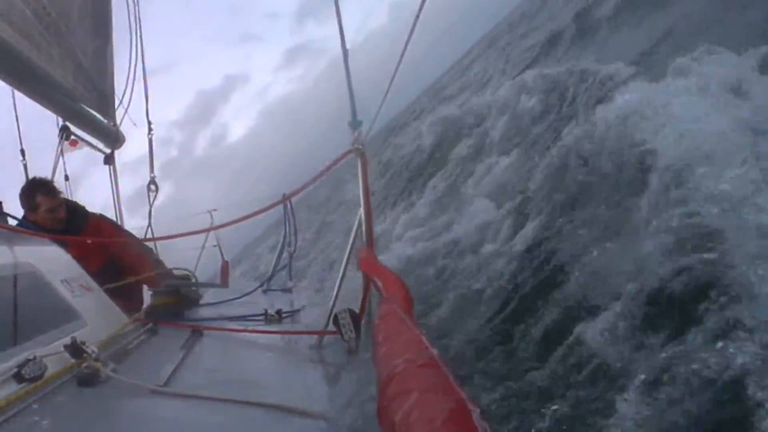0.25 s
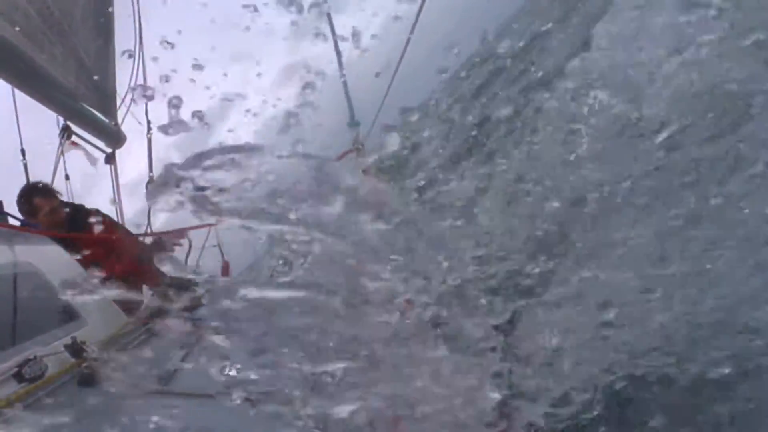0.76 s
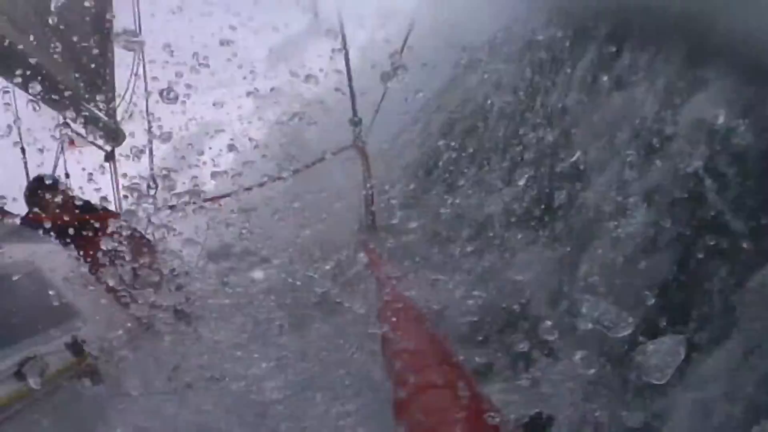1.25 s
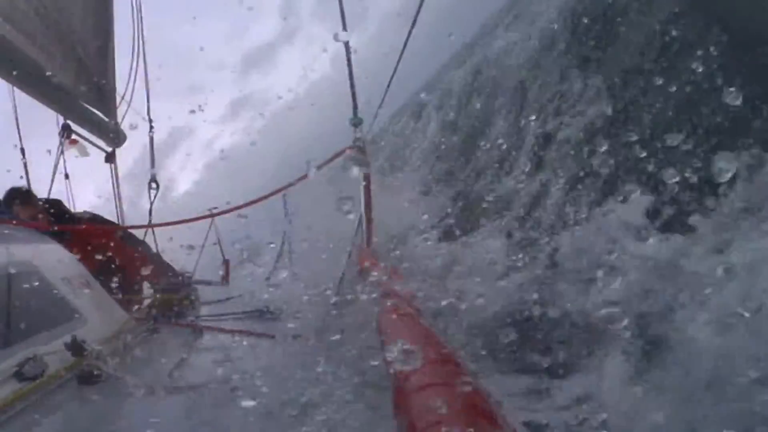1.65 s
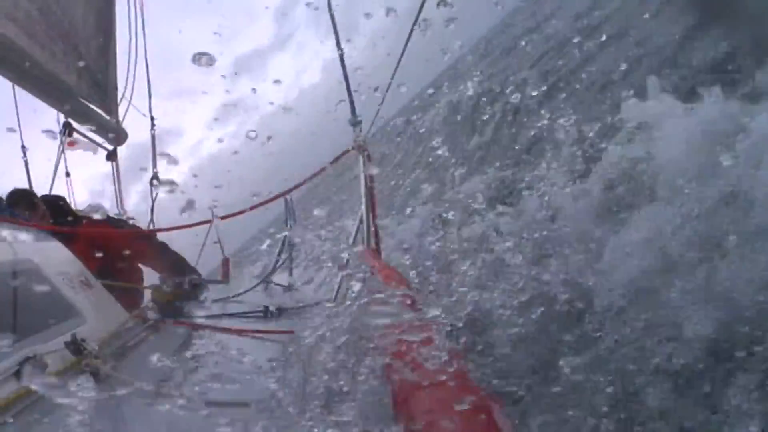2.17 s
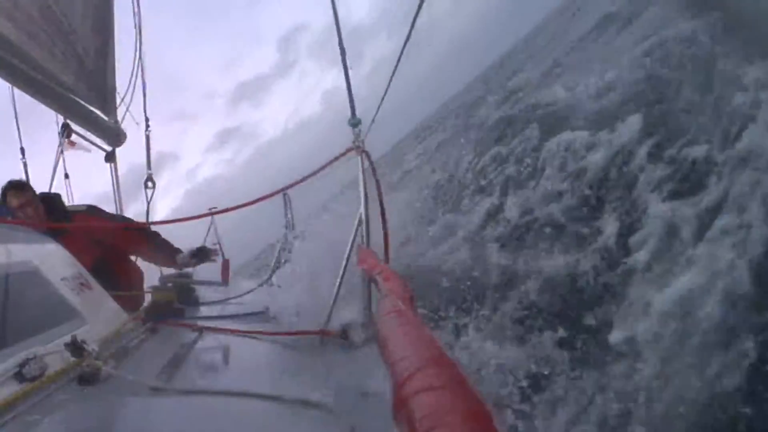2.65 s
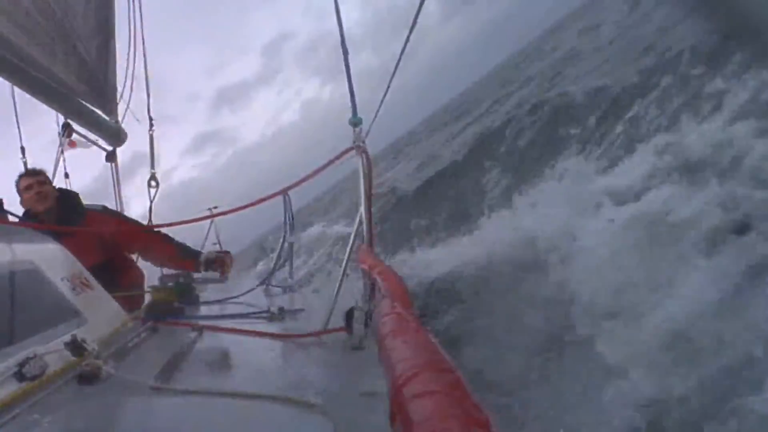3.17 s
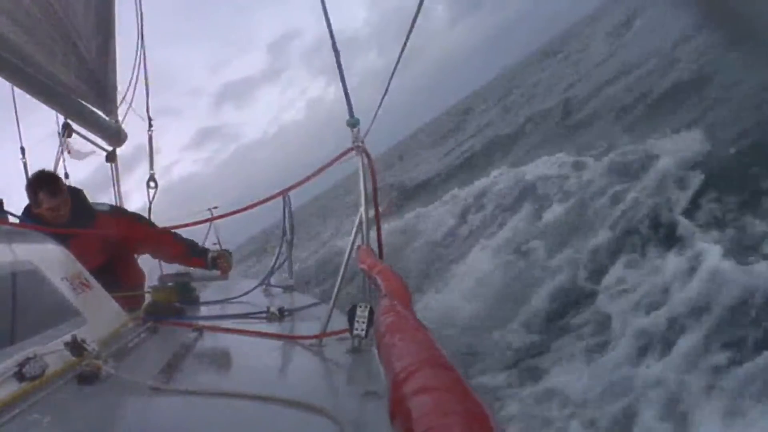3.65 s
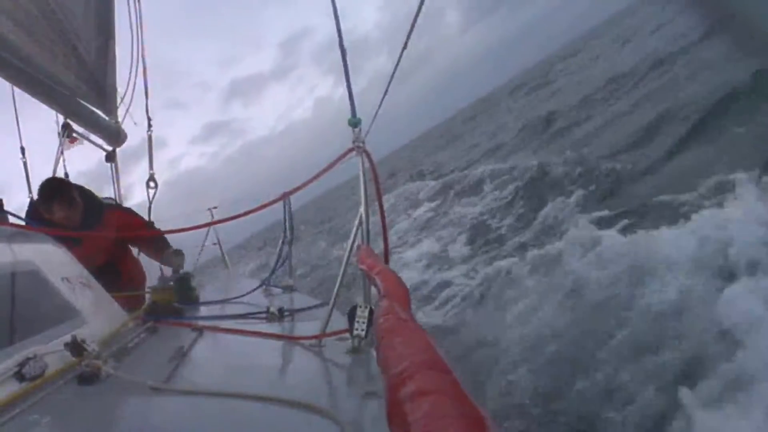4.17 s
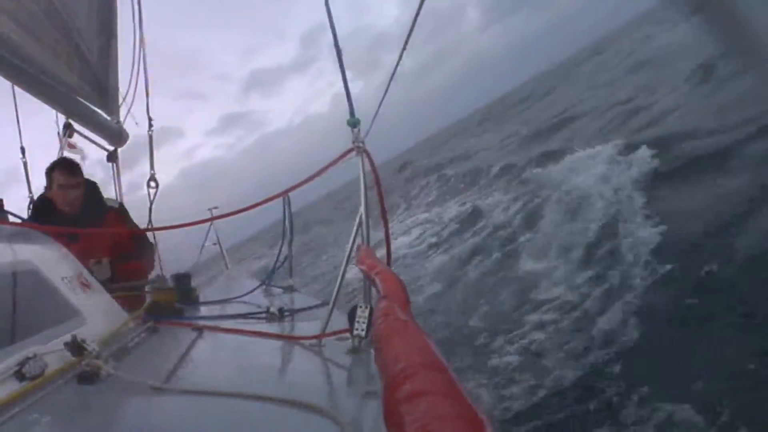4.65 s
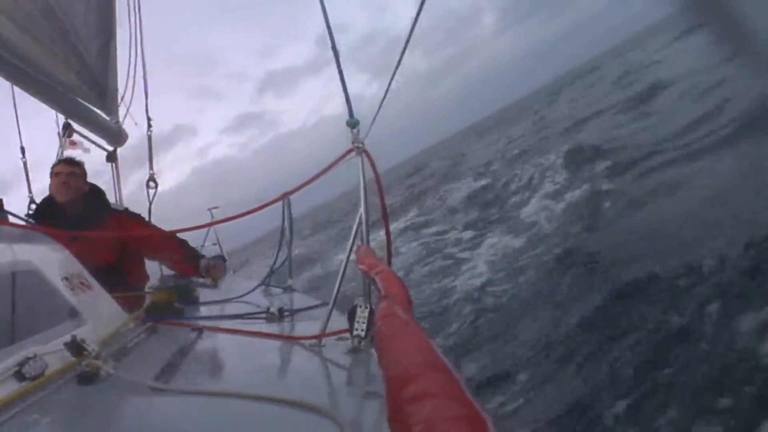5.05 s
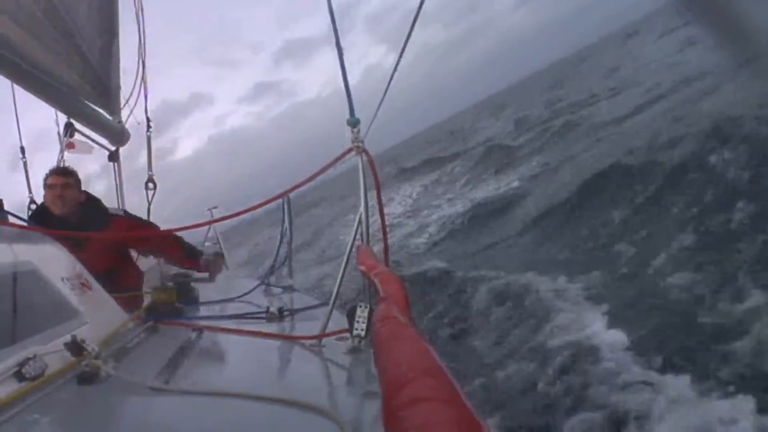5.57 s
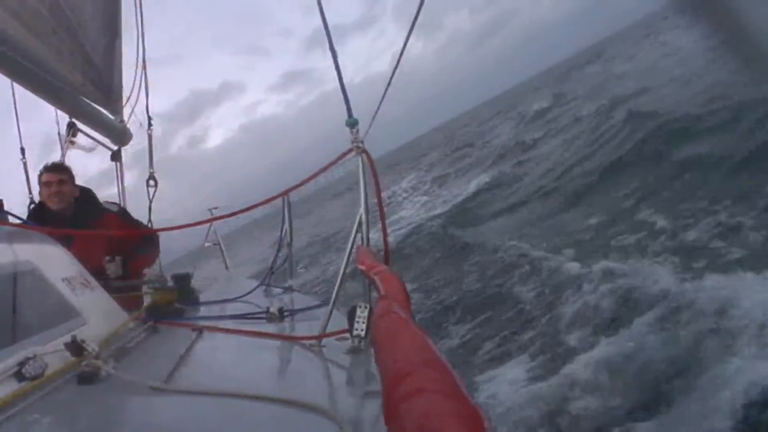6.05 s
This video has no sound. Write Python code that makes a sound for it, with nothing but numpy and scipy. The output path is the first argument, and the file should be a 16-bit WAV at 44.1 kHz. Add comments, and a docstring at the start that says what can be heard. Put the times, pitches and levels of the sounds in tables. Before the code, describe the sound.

A microphone shut in a waterproof housing on a sailing yacht hears everything dull and boxy. Rapid wet slaps and a creaking line come first, then dense spray surges over the case in waves, with gulps and gurgles. Around three seconds water drains away and drops patter; a loose fitting knocks repeatedly. The sea drops to a faint distant wash with soft hull bumps, until two hard slams thud and distort.

```python
"""A sealed camera housing rides the rail of a sailing yacht in breaking seas; all is heard inside the shut case.
From the start wind and swell rock the microphone below hearing, the far sea is a noise floor, spray washes the
housing as noise through its resonances, a line creaks by stick and slip, and water gulps and slaps the lid.
Then trapped air gurgles, drops tick, foam fizzes, a loose fitting knocks, water drains, wet rubber squeaks and
small seas bump the hull. Near the end two heavy slams ring a hull panel and overload the recorder."""
import sys
import numpy as np
from scipy import signal
from scipy.fft import rfft, irfft, next_fast_len
from scipy.io import wavfile
from scipy.ndimage import uniform_filter1d, map_coordinates

SR = 44100
rng = np.random.default_rng(int(sys.argv[2]) if len(sys.argv) > 2 else 0)


def digitize_waveform(pressure):
    """Quantize a signal to 16-bit integers and store it at the path in sys.argv[1].

    Rows of a 2-D input are taken as channels; values are limited to [-1, 1].
    """
    field = np.atleast_2d(pressure).T
    bounded = np.clip(field, -1, 1)
    quanta = np.round(bounded * 32767).astype(np.int16)
    wavfile.write(sys.argv[1], SR, quanta)


def nominal_scale(level):
    """Amplitude ratio for a level in decibels (scalar or array-like)."""
    x = np.asarray(level, float) / 20
    return 10 ** x


N = 278271


def unit(x):
    """Scaled to rms 1."""
    return x / np.sqrt(np.mean(x ** 2, -1, keepdims=True) + 1e-20)


def column(values):
    """One row per part of the housing."""
    return np.array(values)[:, None]


def curves(rows):
    """One value per sample for each column after the time."""
    knots_s, *columns = np.transpose(rows)
    return np.array([np.interp(np.arange(N) / SR, knots_s, c) for c in columns])


def wobble(rate):
    """A smooth random curve, rate knots a second."""
    knots = rng.standard_normal(int(N * rate / SR) + 4)
    return map_coordinates(knots, [np.arange(N) * rate / SR])


def coloured(spectrum):
    """Noise of rms 1 shaped by rows of Hz and relative dB per Hz."""
    size = next_fast_len(N)
    f, db = np.transpose(spectrum)
    hz = np.fft.rfftfreq(size, 1 / SR)
    gain = nominal_scale(np.interp(np.log(hz + 1), np.log(f + 1), db))
    return unit(irfft(rfft(rng.standard_normal(size)) * gain, size)[:N])


# Housing and mount resonances. Each row: centre in Hz, width parameter in Hz, relative level in dB.
RESONANCES = [(92.5, 93, -19), (129.7, 21.6, 2), (184.6, 18, -5), (246.5, 75, -7.5), (309.6, 40.7, -6),
              (431.7, 92, -14.5), (549.6, 81, -9.5), (621.4, 49, -3), (691, 29, -4), (756.4, 107, -6.5),
              (953, 130, -7), (1126, 100, -18.5), (1397, 59, 2.5), (1469, 72, 6.5), (1544, 123, 4),
              (1640, 99, -6.5), (1836, 230, -3.5), (2026, 110, -10), (2320, 1300, -24.5), (2990, 320, -30),
              (3173, 210, -23.5), (3464, 170, -27.5), (3936, 217, -22.5), (4300, 440, -34.5),
              (5330, 4500, -54)]
# Edges in Hz of the parts, heavy to light: rail, mount, body, lid, lid corner, lens port.
# Every per-part table below keeps this order.
PART_EDGES_HZ = [60, 155, 470, 1270, 1740, 2180, 6200]


def rings(extra_db=0):
    """Causal impulse response of each part of the housing, peak 1, from its share of the resonances."""
    size = 2 ** 14
    hz = np.fft.rfftfreq(size, 1 / SR) + 0.00086
    modes = np.add(RESONANCES, np.outer(extra_db, [0, 0, 1]))
    power = sum(nominal_scale(2 * db) / (1 + (2 * (hz - c) / w) ** 2) ** 2.27 for c, w, db in modes)
    low_hz, high_hz = column(PART_EDGES_HZ[:-1]), column(PART_EDGES_HZ[1:])
    steep = np.clip(high_hz / 60, 3, 9)  # the low parts overlap more
    share = 1 / (1 + (low_hz / hz) ** (2 * steep)) / (1 + (hz / high_hz) ** (2 * steep))
    cepstrum = irfft(np.log(power * share + 1e-13) / 2)
    cepstrum[:, 1:size // 2] *= 2  # folding the cepstrum makes the ring follow its blow
    cepstrum[:, size // 2 + 1:] = 0
    ring = irfft(np.exp(rfft(cepstrum)))[:, :size // 2]
    return ring / np.abs(ring).max(1, keepdims=True)


def through(force, ring):
    """Forces on the parts, heard through their rings."""
    return signal.fftconvolve(force, ring, axes=1)[:, :N]


# Wind and swell. Each row: time in seconds, level in dB.
ROCKING_DB = [(0.0, -49), (1.18, -46), (1.32, -30), (1.72, -44.5), (2.16, -31), (2.34, -53), (2.39, -36),
              (2.53, -43.5), (3.62, -45.5), (3.69, -53), (5.36, -48.5), (5.43, -37), (5.59, -47),
              (6.31, -57)]
# Each row: frequency in Hz, relative dB per Hz.
ROCKING_SPECTRUM = [(4.7, -35.5), (8.0, -6.5), (16, 1.5), (34, 1.5), (64, -19), (90, -25.5), (120, -60.5),
                    (200, -120)]


def rocking():
    """Wind and swell make slow pressure lumps, mostly below hearing."""
    return nominal_scale(curves(ROCKING_DB)[0]) * coloured(ROCKING_SPECTRUM)


# Each row: time in seconds, level in dB.
FAR_SEA_DB = [(0, -50), (3.5, -52), (4.3, -46.5), (4.7, -50), (5.2, -53), (5.6, -51.5), (5.85, -51),
              (6.31, -50)]
# Sea through the shut case. Each row: frequency in Hz, relative dB per Hz.
FAR_SEA_SPECTRUM = [(35, -27), (60, -1.5), (81, -1), (123, -4.5), (226, -1), (364, -17), (630, -25),
                    (733, -20.5), (1070, -19.5), (1400, -9.5), (1900, -21), (2260, -18.5), (2520, -28.5),
                    (2900, -19.5), (3300, -34), (3890, -19.5), (4150, -25.5), (4450, -27.5), (4950, -36),
                    (5400, -36), (5750, -39), (6200, -79.5), (12300, -120)]


def far_sea():
    """The distant sea is a smooth noise floor that wavers slightly."""
    return nominal_scale(curves(FAR_SEA_DB)[0] + 1.5 * wobble(7.9)) * coloured(FAR_SEA_SPECTRUM)


# Spray and solid water on the lid, then thin drizzle.
# Each row: time in seconds, strength in dB, spread (extra off the lid) in dB.
SPRAY_STRENGTH = [(0.0, -18, 0.5), (0.06, -18.5, -0.5), (0.25, -20.5, 2), (0.41, -22.5, 9.5),
                  (0.46, -36, -3.5), (0.55, -52, 2), (0.66, -33, -1), (0.81, -26, 5.5), (0.89, -15.5, 12),
                  (0.92, -22.5, 4.5), (0.98, -13.5, 10), (1.01, -20, 5), (1.08, -18.5, 7.5),
                  (1.14, -33, -6), (1.2, -25, 1), (1.26, -40.5, -16), (1.3, -25, -3), (1.42, -19.5, -3.5),
                  (1.5, -19, -7), (1.6, -19, -7.5), (1.82, -38, -3), (2.0, -27.5, -6.5), (2.1, -28, -0.5),
                  (2.21, -20.5, 0), (2.3, -19.5, -2), (2.42, -20, 5.5), (2.47, -30.5, 0.5),
                  (2.61, -30.5, -3), (2.67, -39, -4), (2.7, -43, 15.5), (2.89, -24.5, 9.5),
                  (2.92, -39.5, 0), (3.01, -20, 8.5), (3.04, -31, 6), (3.25, -34, -13), (3.4, -43.5, 4),
                  (3.45, -40.5, -9), (3.55, -39.5, -29), (3.8, -64.5, 7), (4.0, -53, -1.5), (4.2, -51.5, 4),
                  (4.67, -85, 20), (4.94, -67.5, 1.5), (5.56, -58, -0.5), (6.31, -69, 3)]
# Per part: share of a full wash in dB.
SPRAY_SHARE_DB = [-41.5, -15.5, -9.5, -2, -24.5, -19]
# Per part: growth in dB per dB of spray.
SPRAY_GROWTH = [1.2, 0.46, 0.68, 1.24, 0.37, 0.88]
# Per part: fraction of the spread taken.
SPRAY_SPREAD = [.1, 0.093, 0.65, 0.029, 0.43, 1]
# Per part: seconds over which the spray is evened out.
SPRAY_LINGER_S = [.15, 0.041, 0.088, .005, 0.044, 0.26]
# A film dulls or livens the port. Each row: time in seconds, extra level in dB.
PORT_FILM_DB = [(0, 4.5), (0.5, -6.5), (0.8, -5), (0.93, -6), (1.08, -4), (1.3, 0), (1.6, 4.5), (2.2, -4),
                (2.5, 1), (2.8, 0), (3.2, -11.5), (4, 4.5), (5.4, 8), (5.7, 0), (6.31, 6)]


def spray_gain():
    """Spray drives each part over its own smoothing time and growth law."""
    full_db = -20  # strength of a full wash
    strength_db, spread_db = curves(SPRAY_STRENGTH)
    evened_db = np.array([uniform_filter1d(strength_db, int(s * SR) + 1) for s in SPRAY_LINGER_S])
    grown_db = column(SPRAY_GROWTH) * (evened_db - full_db)
    gain = nominal_scale(full_db + column(SPRAY_SHARE_DB) + grown_db + column(SPRAY_SPREAD) * spread_db)
    gain[-1] *= nominal_scale(curves(PORT_FILM_DB)[0])
    return gain


# Each row: time in seconds, strength in dB.
HULL_STRENGTH = [(0.0, -60.5), (0.98, -40.5), (1.47, -46.5), (1.7, -40.5), (2.67, -48.5), (2.8, -54),
                 (2.99, -28.5), (3.29, -42), (3.58, -44.5), (3.76, -43.5), (3.97, -34.5), (4.55, -53),
                 (4.67, -45), (4.92, -59), (5.43, -46), (5.59, -38.5), (5.71, -44), (5.96, -55),
                 (6.31, -50)]
# Per part: level in dB relative to that strength.
HULL_SHARE_DB = [-1.5, -8, -28.5, -40, -36.5, -48.5]


def hull_gain():
    """The hull drums through the rail, mostly into the heavy parts."""
    return nominal_scale(curves(HULL_STRENGTH) + column(HULL_SHARE_DB))


def water(ring):
    """Dense uneven drops over smooth flow ring the parts; surges are partly shared, the flows add in power."""
    drop_size = nominal_scale(np.minimum(3 * rng.exponential(size=N), 11))
    drops = (rng.random(N) < 1000 / SR) * drop_size * rng.standard_normal((6, N))  # 1000 per s
    force = 0.71 * rng.standard_normal((6, N)) + 0.55 * unit(drops)
    shared_db = 1.1 * wobble(25.07) + 0.91 * wobble(70)
    own_db = column([2.5, 1.2, 1.4, 1.7, 1.5, 1.5]) * np.array([wobble(20) for _ in ring])
    heard = unit(through(nominal_scale(shared_db + own_db) * force, ring))
    gain = np.sqrt(spray_gain() ** 2 + runoff_gain() ** 2 + hull_gain() ** 2)
    wash = (gain * heard).sum(0)
    z = signal.stft(wash, nperseg=1024)[2]
    # the wet surface shifts, so patches of pitch swell and fade
    field = uniform_filter1d(rng.standard_normal(z.shape), 5, axis=0)
    field = uniform_filter1d(field, 9, axis=1)
    return signal.istft(z * nominal_scale(1.4 * field / field.std()), nperseg=1024)[1][:N]


# One list per creak. Each row: time in seconds, slips per second, relative level in dB.
LINE_CREAKS = [
    [(0.0, 270, -20.5), (0.11, 283, -46), (0.156, 264, -34), (0.232, 226, -32.5), (0.26, 195, -29),
     (0.335, 185, -25), (0.36, 188, -38.5), (0.42, 176, -33), (0.47, 190, -29.5)],
    [(1.4, 120, -29.5), (1.436, 207, -32), (1.5, 226, -39), (1.6, 167, -29.5), (1.65, 200, -33.5)],
]


def creak(ring):
    """A loaded line sticks and slips: uneven tugs ring mount and body round a tone at the slip rate."""
    out, t = np.zeros(N), np.arange(N) / SR
    for rows in LINE_CREAKS:
        rate_hz, db = curves(rows)
        slip_count = np.floor(np.cumsum(rate_hz * (1 + 0.071 * wobble(60))) / SR)
        tugs = np.diff(slip_count, prepend=0) * nominal_scale(0.93 * wobble(200))
        mount, body = unit(through(tugs[None], ring[1:3]))
        tone = np.sin(2 * np.pi * np.cumsum(rate_hz) / SR) * np.sqrt(2)
        on = np.clip(np.minimum(t - rows[0][0] + 0.0061, rows[-1][0] - t) / 0.01, 0, 1)
        out += on * nominal_scale(db) * (0.97 * tone + 0.063 * mount + 0.59 * body)
    return out


# Each row: peak time in seconds, length in seconds, pitch in Hz, relative level in dB.
WATER_GULPS = [(0.072, 0.14, 772, -17.5), (0.201, 0.13, 740, -19.5), (0.35, 0.22, 769, -34),
               (0.877, 0.43, 747, -29), (1.085, 0.36, 711, -26), (2.14, 0.34, 730, -29.5),
               (2.52, 0.074, 962, -24.5), (2.643, 0.069, 943, -20), (2.785, 0.056, 740, -14.5),
               (2.881, 0.068, 744, -16), (2.998, 0.16, 723, -23), (3.09, 0.16, 735, -26),
               (4.354, 0.036, 730, -32), (5.138, 0.044, 740, -36), (0.844, 0.11, 176.4, -19.5),
               (1.088, 0.089, 175, -24), (2.376, 0.073, 186, -23)]


def gulps():
    """Water over body and mount gulps: a narrow fluttering noise band swells and fades on a hollow note."""
    out, t = np.zeros(N), np.arange(N) / SR
    for s, length_s, hz, db in WATER_GULPS:
        swell = np.cos(np.pi * np.clip((t - s) / length_s, -.5, .5)) ** 2
        turn = 2 * np.pi * hz * t
        band = wobble(60) * np.cos(turn) + wobble(60) * np.sin(turn)
        out += swell * nominal_scale(db - 5.5) * band
    return out


# Blows wake the resonances unevenly. Per resonance, in table order: extra level in dB.
STRUCK_EXTRA_DB = [0, 3, 2.3, 3, 3.5, -0.5, -4, -5.5, 4, 4, -0.5, -8, -1.5, -4.5, -5.5, 2.5, -3.5, -6, 0,
                   3.5, -9, 1.5, 4, 10.5, 3.5]
# Per part: t60 in seconds of the damping added by contact.
CONTACT_DAMPING_T60_S = [0.4, 0.19, 0.45, 0.063, 0.077, 0.041]


def struck_rings():
    """A blow lands at one spot, and its contact soaks up part of each part's ring."""
    ring = rings(STRUCK_EXTRA_DB)
    t = np.arange(ring.shape[1]) / SR
    return ring * nominal_scale(-60 * t / column(CONTACT_DAMPING_T60_S))


# Per part: fraction of the heft taken.
HEFT_SHARE = np.array([0.8, 0.38, 0, 0.0076, 0.19, 0.47])
# Per part: fraction of the edge taken.
EDGE_SHARE = np.array([0.26, 0.039, 0.065, 0.57, 0.91, 0.96])


def blows(rows, kind_db, struck):
    """Each blow is a first contact and a short uneven chatter; soft blows are mostly chatter."""
    force, t = np.zeros((6, N + SR)), np.arange(SR // 10) / SR
    light = column([.2, .35, .45, .9, 1, 1])  # chatter hardly moves the heavy parts
    for s, db, heft_db, edge_db, softness in rows:
        soft = np.clip(softness, 0, 1)
        rise = 1 - np.exp(-t / (0.0061 * soft ** 2 + 1e-4))
        decay = nominal_scale(-60 * t / (0.0079 + 0.13 * soft))
        contact = (1 - soft * light) ** 6.8 * (t == 0)
        chatter = 0.46 * soft * light * rng.standard_normal(len(t)) * rise * decay
        part_db = db + np.array(kind_db) + heft_db * HEFT_SHARE + edge_db * EDGE_SHARE
        start = round((s - .0008) * SR)
        force[:, start:][:, :len(t)] += nominal_scale(part_db)[:, None] * (contact + chatter)
    return through(force, struck).sum(0)


# Each row: time in seconds, level in dB, heft (extra, mostly into the rail, partly into port and mount) in dB,
# # edge (extra into light parts) in dB, softness 0-1.
LID_SLAPS = [(0.029, -11, -5, .1, 0.46), (0.059, -6.5, -3, .1, 0.45), (0.109, -22, -3, .1, 0.27),
             (0.135, -5.5, 0, 0.12, 0.32), (0.165, -8.5, -10, .1, 0.44), (0.199, -8, -9, .1, 0.27),
             (0.247, -8, -8, 0.1, 0.41), (0.314, -7.5, -2, .1, 0.29), (2.097, -14.5, -5, .1, 0.36),
             (3.244, -38, -2, .1, 0.26), (4.166, -30.5, 1, .1, 0.37), (0.4895, -16.5, -2, 0.11, 0.25),
             (0.7236, -12, -7, 0.1, 0.31), (1.282, -13.5, 3, 0.1, 0.39), (4.647, -29.5, 2, 0.1, 0.57),
             (4.9194, -32.5, 22, 0.1, 0.5)]
# Per part: level offset in dB.
SLAP_PART_DB = [-37.5, -29.5, -9, -3.5, -14.5, -42.5]


def slaps(struck):
    """Gobs of water slap the lid."""
    return blows(LID_SLAPS, SLAP_PART_DB, struck)


# Each row: middle in seconds, length in seconds, start pitch in Hz, end pitch in Hz, relative level in dB.
AIR_GURGLES = [(2.1, 0.084, 250, 290, -21), (2.2, 0.197, 520, 800, -29.5), (2.2, .12, 150, 310, -26),
               (2.36, 0.28, 940, 960, -31.5), (2.9, .1, 640, 640, -27), (2.815, 0.165, 360, 415, -31.5),
               (2.955, 0.18, 395, 405, -35.5), (2.865, 0.071, 110, 150, -17), (3.038, 0.039, 130, 126, -24),
               (3.055, 0.057, 255, 207, -22.5), (3.15, 0.21, 135, 250, -31), (3.21, .05, 245, 266, -27),
               (.93, 0.077, 250, 190, -29.5), (1.1, 0.05, 250, 320, -24), (.985, 0.077, 640, 590, -26),
               (1.5, 0.036, 660, 620, -24), (1.1, 0.076, 790, 840, -27)]


def gurgles():
    """Trapped air slides in pitch as water fills or leaves a hollow: an unsteady tone swells and fades."""
    out, t = np.zeros(N), np.arange(N) / SR
    for s, length_s, start_hz, end_hz, db in AIR_GURGLES:
        u = np.clip((t - s) / length_s + .5, 0, 1)
        slide_hz = start_hz + (end_hz - start_hz) * u
        phase = 2 * np.pi * np.cumsum(slide_hz * (1 + 0.027 * wobble(45))) / SR
        out += nominal_scale(db + 2.5 * wobble(35)) * np.sin(np.pi * u) ** 2 * np.sin(phase)
    return out


# Drops on the port. Each row: start in seconds, relative level in dB, pitch in Hz.
PORT_DROPS = [(1.193, -55, 3320), (1.2516, -46, 2500), (1.253, -60, 3870), (1.277, -60, 2880),
              (1.844, -47, 2920), (1.923, -46, 3860), (1.968, -46, 4200), (1.9869, -25.5, 3940),
              (1.992, -46, 3706), (1.99, -27, 1866), (2.5144, -33, 3980), (3.1418, -36, 2320),
              (3.187, -45, 2890), (3.212, -41.5, 3700), (3.2257, -37, 2980), (3.243, -43, 2920),
              (3.3418, -47, 2900), (3.3732, -65, 2610), (4.498, -46, 2950), (5.02, -53, 4100),
              (5.075, -56, 2400), (5.163, -53, 4000), (5.288, -52, 3000), (5.3692, -41, 3800),
              (5.37, -48, 2900), (5.37, -35, 1970), (5.875, -52, 2920)]
# The last of the sea falls back as scattered drops: from and to, in seconds.
PATTER_SPAN_S = (3.05, 3.255)


def droplets():
    """Single drops tick on the port: a few milliseconds of rough tone at their pitch."""
    out, t = np.zeros(N + SR), np.arange(SR // 50) / SR
    drops = list(PORT_DROPS)
    for place, size, pitch in rng.random(size=(24, 3)):
        start_s = np.interp(place, [0, 1], PATTER_SPAN_S)
        drops.append((start_s, -48 - 3.5 * np.log(size + 0.056), 900 * 5 ** pitch))
    grains = unit(uniform_filter1d(rng.standard_normal((len(drops), len(t))), size=24, axis=1))
    for (s, db, hz), grain in zip(drops, grains):
        envelope = nominal_scale(db - 60 * t / 0.018) * (1 - np.exp(-t / 0.0006))
        tick = envelope * (1.64 + 0.74 * grain) * np.sin(2 * np.pi * hz * t)
        out[round(s * SR):][:len(t)] += tick
    return out[:N]


# Each row: time in seconds, level in dB.
FIZZ_DB = [(0, -93.5), (1.15, -89), (1.25, -75), (1.65, -65.5), (1.9, -69.5), (2.4, -74.5), (2.8, -65.5),
           (3.1, -81), (3.4, -87.5), (6.31, -97.5)]
# Each row: frequency in Hz, relative dB per Hz.
FOAM_SPECTRUM = [(4300, -120), (4800, -13), (5250, -7), (5600, -8), (5850, -18), (6400, -120)]


def foam():
    """A film of foam left on the port fizzes: thin, high, flickering noise."""
    return nominal_scale(curves(FIZZ_DB)[0] + 2.5 * wobble(40)) * coloured(FOAM_SPECTRUM)


# Each row: time in seconds, level in dB, heft in dB, edge in dB, softness 0-1.
FITTING_KNOCKS = [(1.251, -18.5, 13.5, 8, 0.27), (3.304, -29, 26, 0, 0.23), (3.325, -33.5, 2, -4, 0.5),
                  (3.345, -27, 11, 2, 0.25), (3.365, -31, 11, -3, 0.3), (3.385, -24.5, 15, -7, 0.4),
                  (3.402, -26.5, 11, -3, 0.23), (3.417, -31, 8, -6, 0.14), (3.43, -32, 8, -6, 0.03),
                  (3.479, -18, 11, -11.5, 0.19), (3.63, -15.5, 3.5, -1, 0.24), (3.764, -15.5, 1, -15, 0.15),
                  (3.815, -13.5, 1, -8, 0.33), (3.887, -11, -4, -7, 0.29), (3.946, -25, -8, 5, 0.39),
                  (3.984, -8.5, -12, -3, 0.3), (4.072, -9.5, -1, 1, 0.22), (4.185, -7, 2, -4.5, 0.25)]
# Per part: level offset in dB.
KNOCK_PART_DB = [-14, -2.5, -6, -3.5, -7.5, -28.5]


def knocks(struck):
    """A loose fitting knocks on the body."""
    return blows(FITTING_KNOCKS, KNOCK_PART_DB, struck)


# Each row: mode in Hz, relative level in dB, t60 in seconds.
FITTING_MODES = [(272.3, -6.5, 0.06), (432, -18, .1), (657, -8.5, 0.11), (727, -3.5, .045),
                 (938, -11, 0.065), (1100, -19, .04), (1467, -6, 0.06), (1818, -16, .045)]


def fitting():
    """Every knock rings the fitting's own modes, each a little stronger or weaker."""
    out, t = np.zeros(N + SR), np.arange(SR // 5) / SR
    rise = 1 - np.exp(-t / 0.0016)
    for s, db, *_ in FITTING_KNOCKS:
        modes = np.zeros(len(t))
        for hz, mode_db, t60_s in FITTING_MODES:
            luck_db = 1.8 * rng.standard_normal()
            modes += nominal_scale(mode_db + luck_db - 60 * t / t60_s) * np.sin(2 * np.pi * hz * t)
        out[round(s * SR):][:len(t)] += nominal_scale(db - 3.5) * modes * rise
    return out[:N]


# Each row: time in seconds, strength in dB.
RUNOFF_STRENGTH = [(1.95, -43), (2.451, -39), (2.6, -27), (2.67, -33.5), (2.708, -23), (2.861, -26),
                   (2.929, -31.5), (3.01, -25), (3.049, -36), (3.2, -43.5), (3.5, -63)]
# Per part: level in dB relative to that strength.
RUNOFF_SHARE_DB = [-23, -14, -7.5, -16, 0, -14.5]


def runoff_gain():
    """The second sea drains round the lid corner."""
    t = np.arange(N) / SR
    running = np.clip(np.minimum(t - RUNOFF_STRENGTH[0][0], RUNOFF_STRENGTH[-1][0] - t) / 0.1, 0, 1)
    return running * nominal_scale(curves(RUNOFF_STRENGTH) + column(RUNOFF_SHARE_DB))


# Each row: start in seconds, length in seconds, start pitch in Hz, end pitch in Hz, relative level in dB.
RUBBER_SQUEAKS = [(1.978, .026, 3950, 4050, -41), (3.943, .024, 3880, 3950, -46),
                  (3.955, .02, 4350, 4600, -54), (3.945, .035, 2000, 2400, -42),
                  (5.44, .02, 3950, 3980, -58), (5.46, .025, 3950, 3980, -52),
                  (5.488, .03, 3950, 3980, -58)]


def squeaks():
    """Wet rubber squeaks: short rising, rough whistles."""
    out = np.zeros(N)
    for s, length_s, start_hz, end_hz, db in RUBBER_SQUEAKS:
        u = np.clip((np.arange(N) / SR - s) / length_s, 0, 1)
        rough_hz = start_hz + (end_hz - start_hz) * u + 90 * wobble(440)
        phase = 2 * np.pi * np.cumsum(rough_hz) / SR
        out += nominal_scale(db + 1.5 * wobble(180)) * np.sin(np.pi * u) * np.sin(phase)
    return out


# Each row: time in seconds, level in dB, heft in dB, edge in dB, softness 0-1.
HULL_BUMPS = [(2.82, -31.5, 2.5, -4, 0.35), (3.027, -27, 5.5, 2, 0.42), (3.176, -21, -9, -6, .2),
              (3.193, -43, -7, -4, .2), (3.209, -34, -1, -3, 0.31), (4.345, -39, 3, 1, 0.58),
              (4.375, -43, 13, -9, 0.64), (4.756, -35, -19, -6, 0.65), (4.925, -38.5, -2, -6, 0.62),
              (5.133, -39.5, 5, -4, 0.79), (5.654, -49.5, -9, 33, 0.69), (5.666, -39.5, -1, 25, 0.66),
              (5.902, -30.5, -2.5, 6, 0.57), (5.937, -42.5, 13.5, 3, 0.73), (6.03, -42.5, -7, -2, 0.88)]
# Per part: level offset in dB.
BUMP_PART_DB = [7, 1.5, -6, -11, -18.5, -44]


def bumps(struck):
    """Small seas bump the hull softly."""
    return blows(HULL_BUMPS, BUMP_PART_DB, struck)


# Each row: time in seconds, level in dB, heft in dB, edge in dB, softness 0-1.
BOW_SLAMS = [(5.4105, -13, 12.5, -4.5, 0.39), (5.417, -18, 17, 8.5, 0.14), (5.431, -27.5, -3, -15, 0.56),
             (6.2405, -12.5, -28.5, 8.5, 0.27), (6.248, -15.5, 2, -10, 0.34)]
# Per part: level offset in dB.
SLAM_PART_DB = [-23, 9, 2, 1.5, -1.5, -7.5]


def slams(struck):
    """The bow slams, each time in two or three contacts."""
    return blows(BOW_SLAMS, SLAM_PART_DB, struck)


# Hull panel under the mount. Each row: mode in Hz, t60 in seconds.
PANEL_MODES = [(124, 0.1), (184, 0.15), (295, 0.07)]
# Each row: start in seconds, then relative level in dB of each mode.
PANEL_THUDS = [(5.4069, 2, -12, -5), (6.2403, -7.5, -11, 0.5)]


def thuds():
    """Each slam rings the panel: it swings at once and dies away mode by mode."""
    out, t = np.zeros(N + SR), np.arange(SR // 2) / SR
    hold = 1.44  # above 1 the swing holds before it collapses
    rise = 1 - np.exp(-(t / 0.0035) ** 2)
    for s, *levels_db in PANEL_THUDS:
        modes = np.zeros(len(t))
        for (hz, t60_s), db in zip(PANEL_MODES, levels_db):
            modes += nominal_scale(db - 60 * (t / t60_s) ** hold) * np.sin(2 * np.pi * hz * t)
        out[round(s * SR):][:len(t)] += modes * rise
    return out[:N]


def scene():
    """All sources meet at one microphone."""
    ring, struck = rings(), struck_rings()
    steady = rocking() + far_sea() + water(ring) + foam()
    wet = gulps() + gurgles() + droplets() + squeaks()
    struck_sounds = slaps(struck) + knocks(struck) + fitting() + bumps(struck) + slams(struck) + thuds()
    return (steady + creak(ring) + wet + struck_sounds)[None]


def top_cut(x):
    """Nothing passes above the cut-off."""
    return signal.sosfilt(signal.butter(12, 15400, fs=SR, output="sos"), x)


def record(dry):
    """The shut case stops the treble; the input stage flattens the slams, splattering them upward, and hisses."""
    case = signal.cheby2(10, 45, 6300, fs=SR, output="sos")  # 45 dB down from 6300 Hz
    muffled = signal.sosfilt(case, dry)
    limit = np.where(muffled > 0, .755, .68)
    clipped = muffled / (1 + np.abs(muffled / limit) ** 30) ** (1 / 30)
    hiss = nominal_scale(-86.5) * rng.standard_normal(N)
    offset = -0.0099  # the converter rests below zero
    return top_cut(clipped + offset + hiss)


dry = scene()
out = record(dry)
digitize_waveform(out)
```